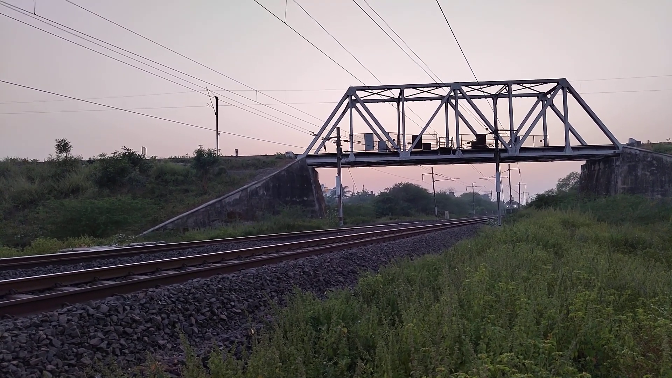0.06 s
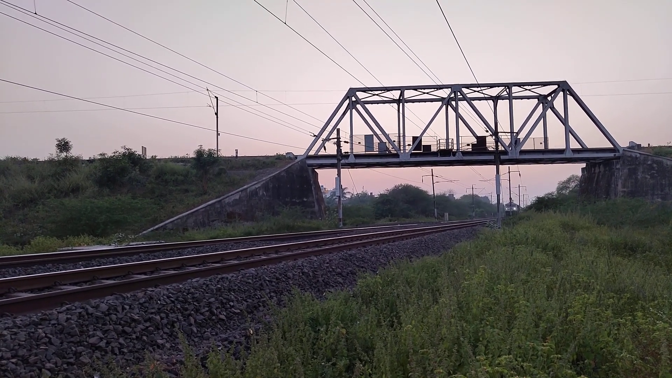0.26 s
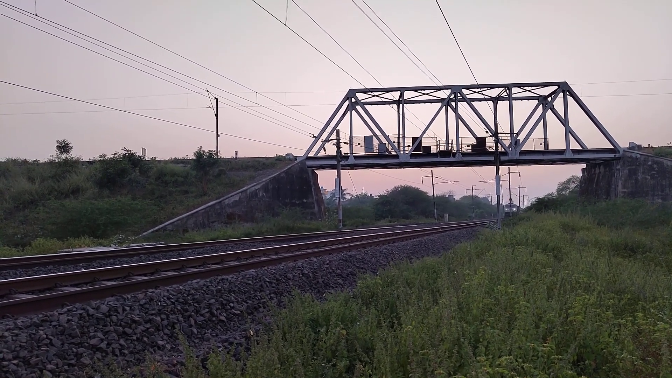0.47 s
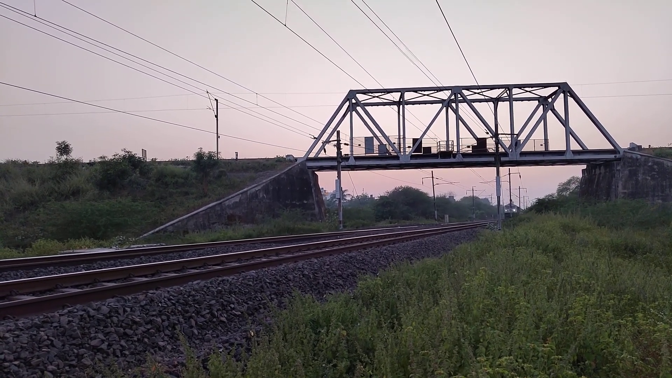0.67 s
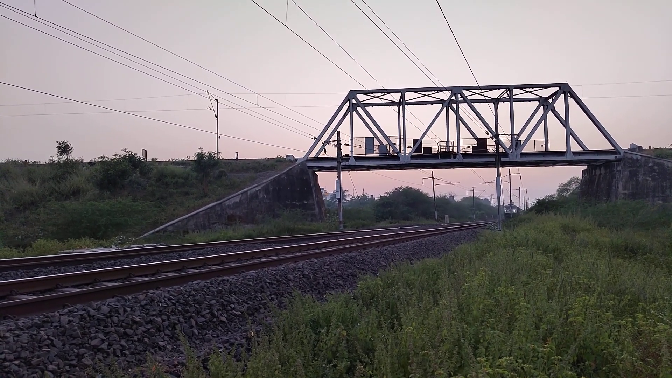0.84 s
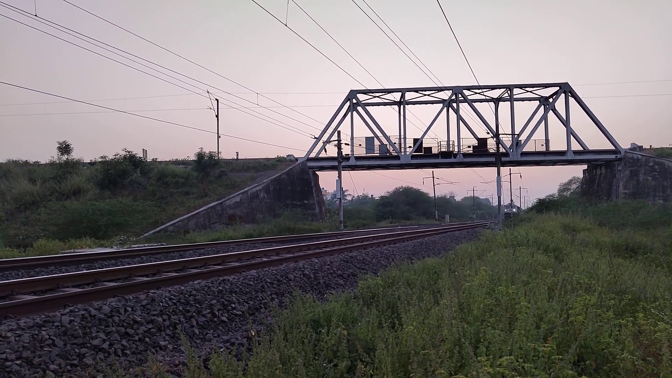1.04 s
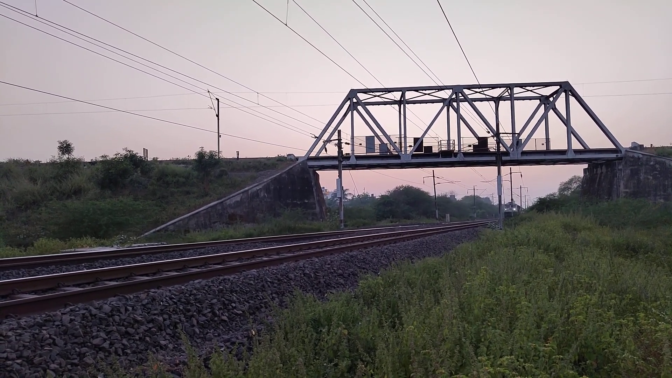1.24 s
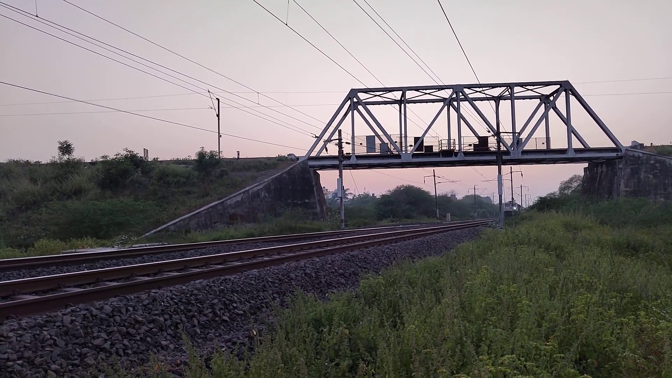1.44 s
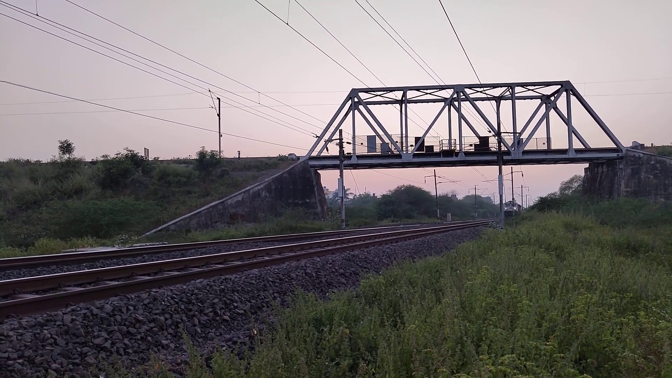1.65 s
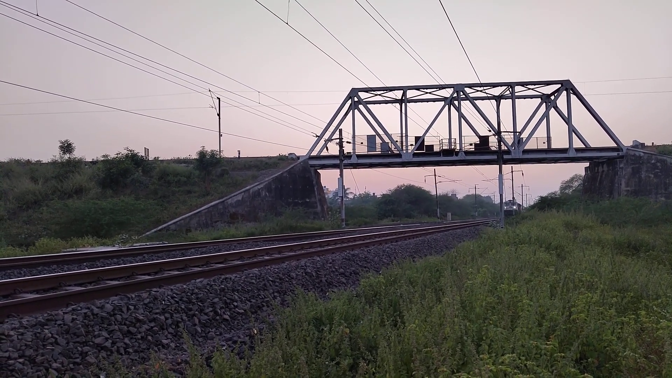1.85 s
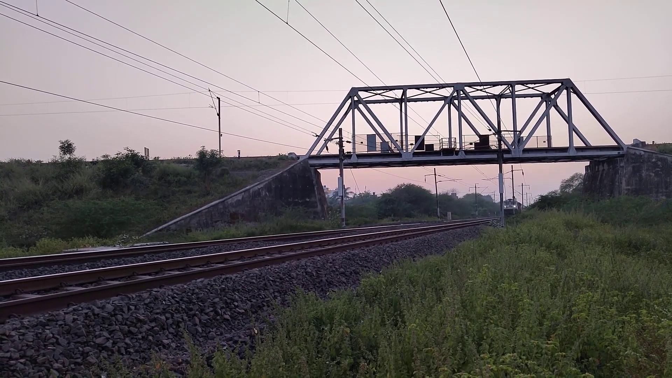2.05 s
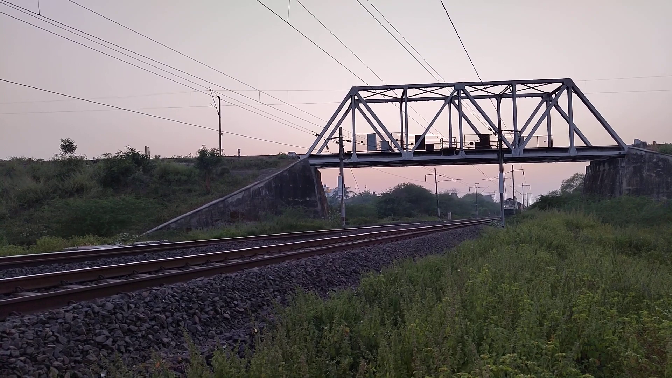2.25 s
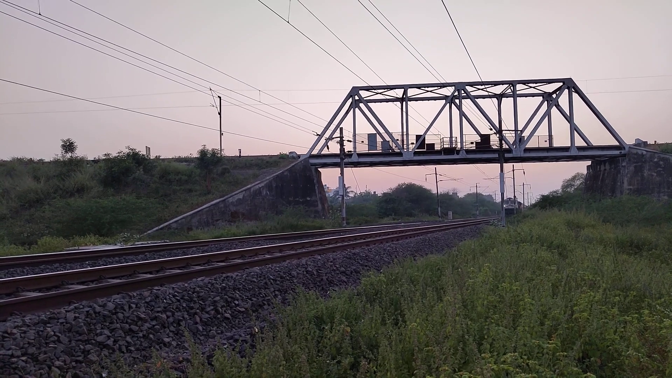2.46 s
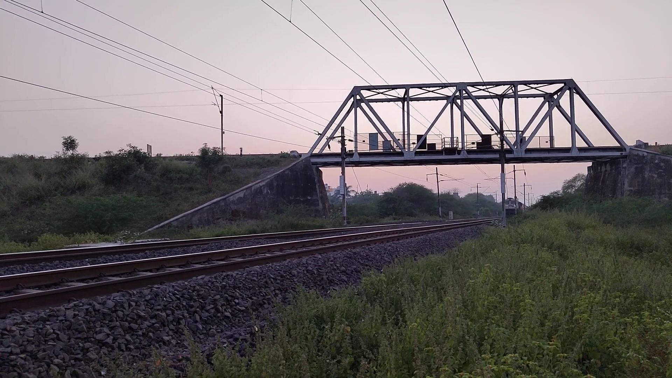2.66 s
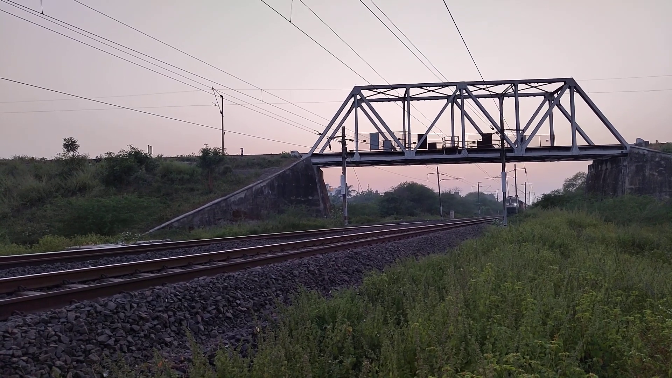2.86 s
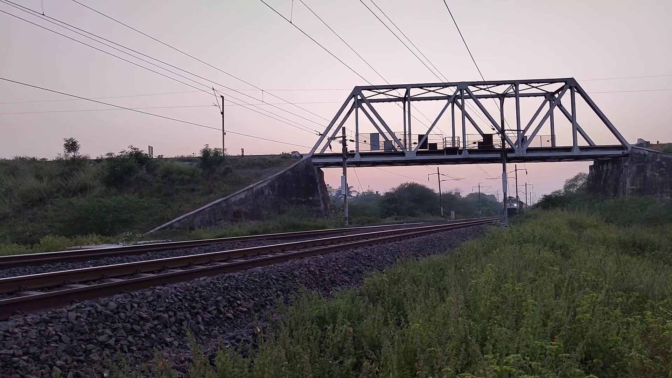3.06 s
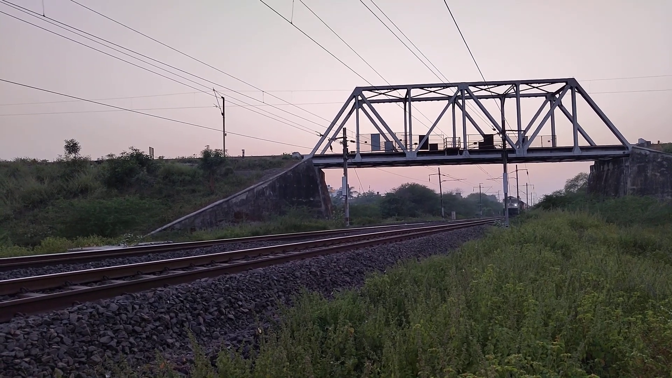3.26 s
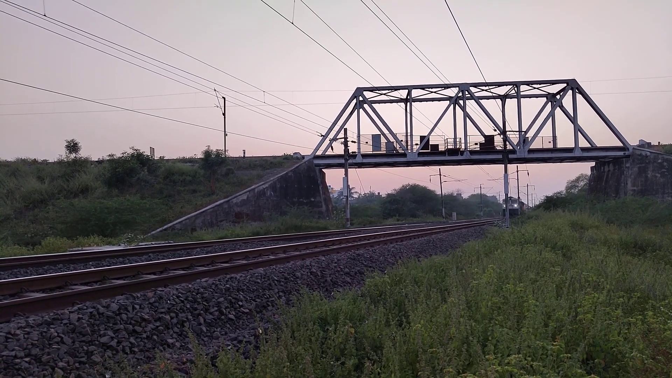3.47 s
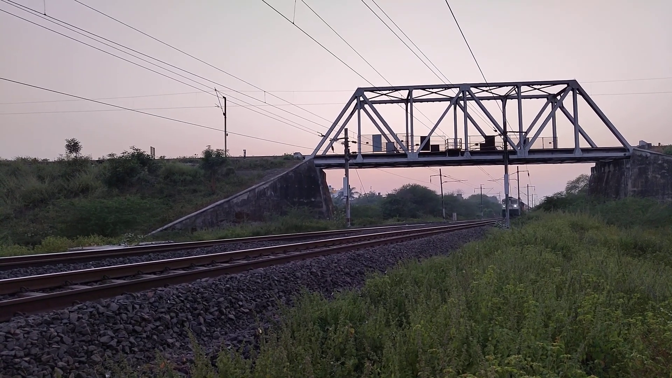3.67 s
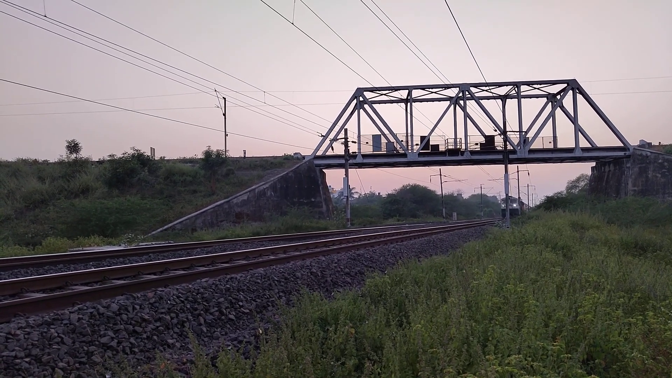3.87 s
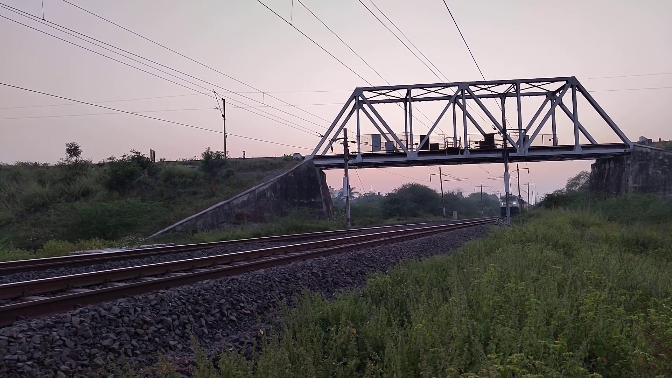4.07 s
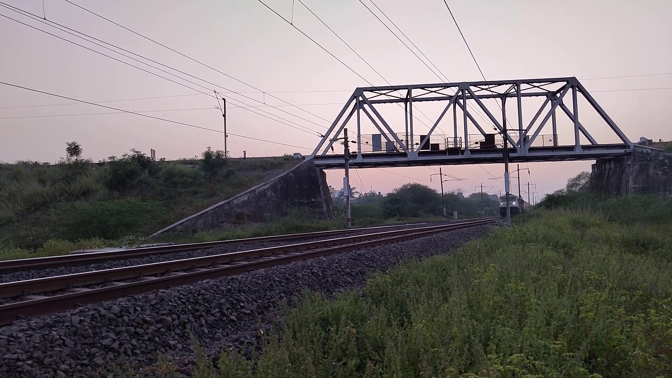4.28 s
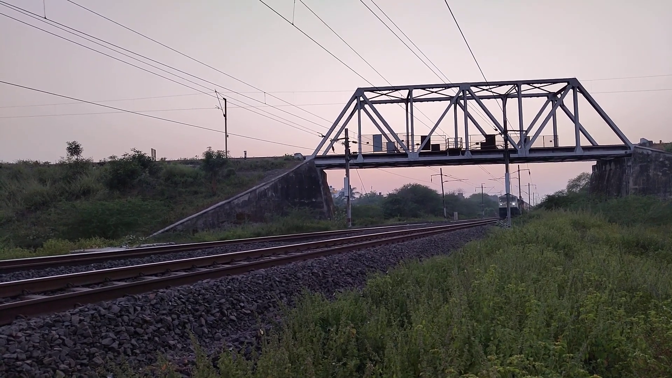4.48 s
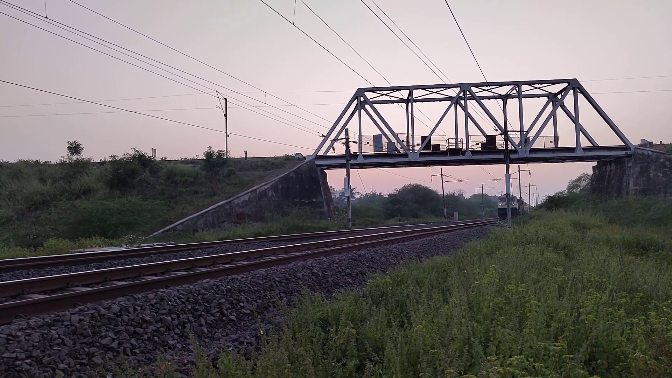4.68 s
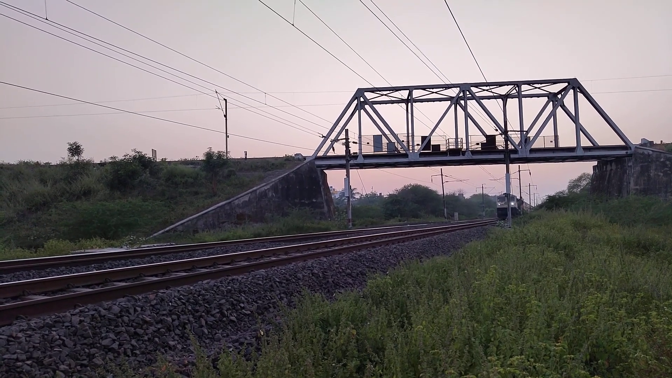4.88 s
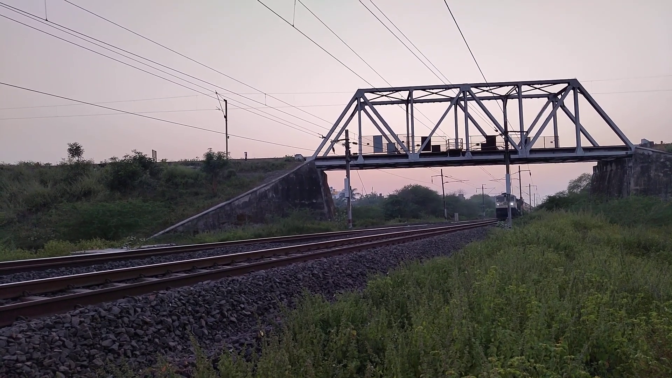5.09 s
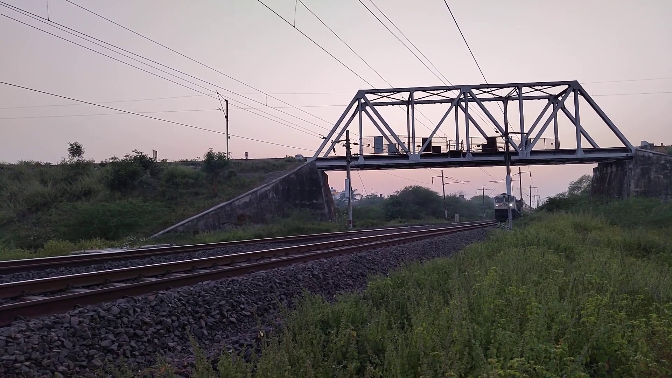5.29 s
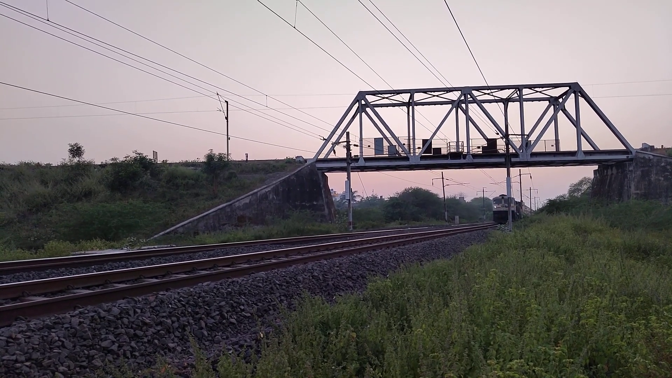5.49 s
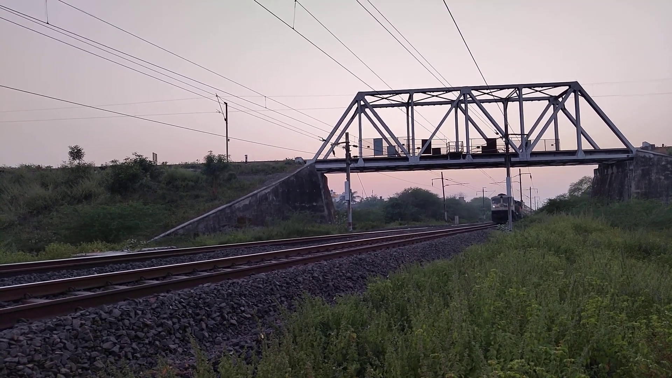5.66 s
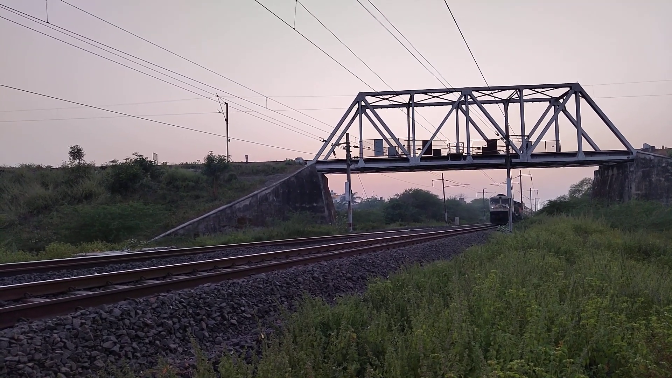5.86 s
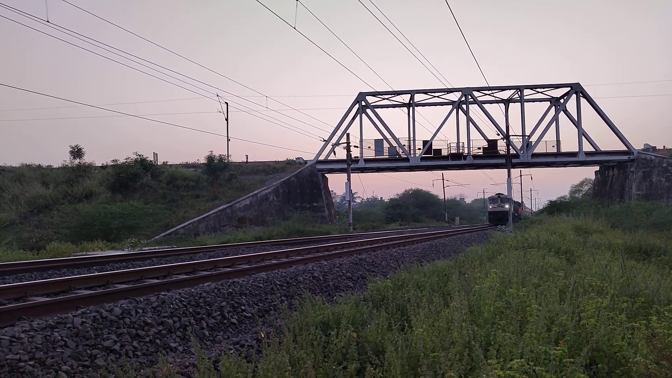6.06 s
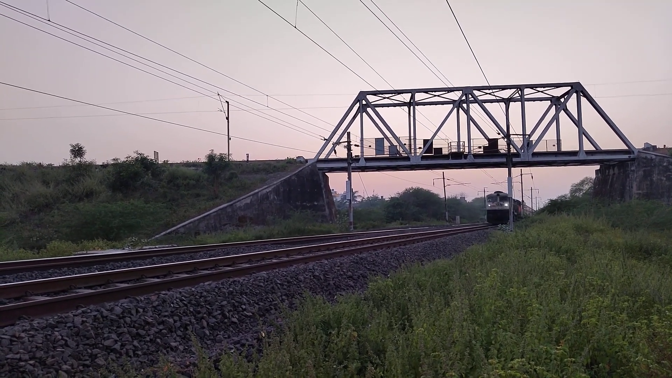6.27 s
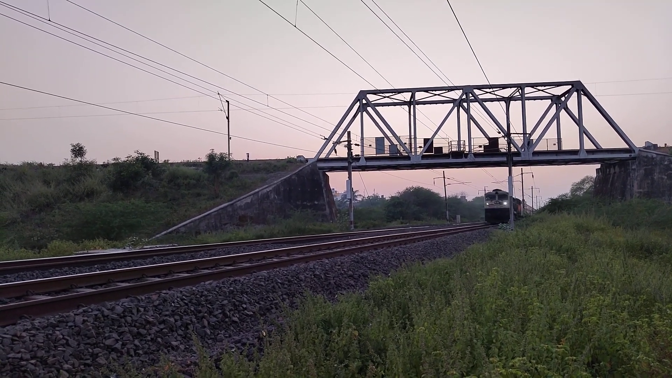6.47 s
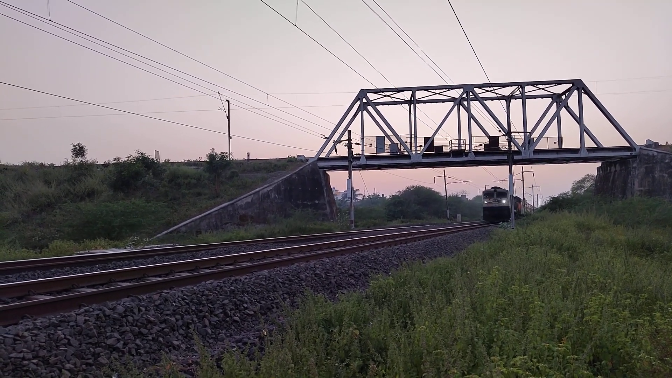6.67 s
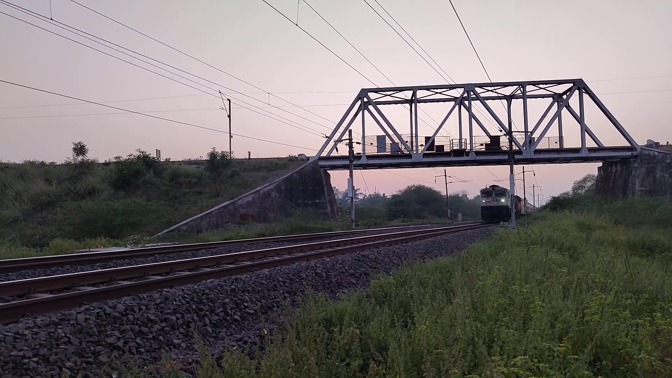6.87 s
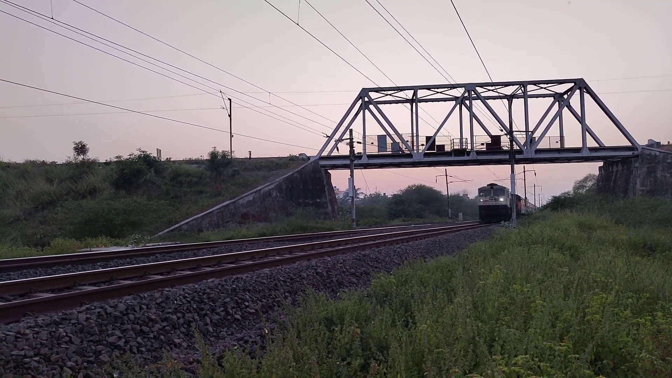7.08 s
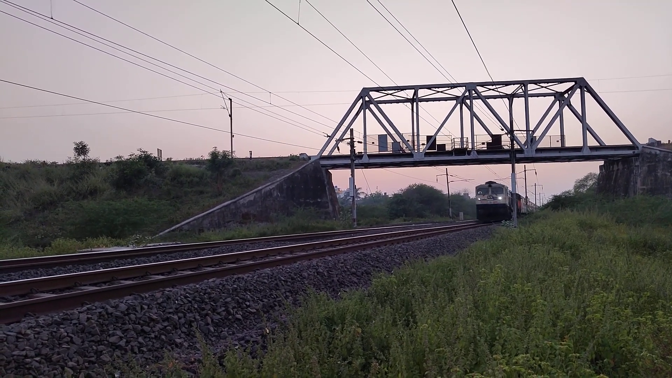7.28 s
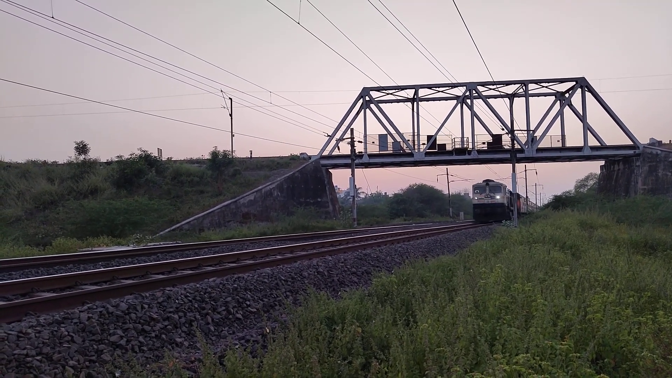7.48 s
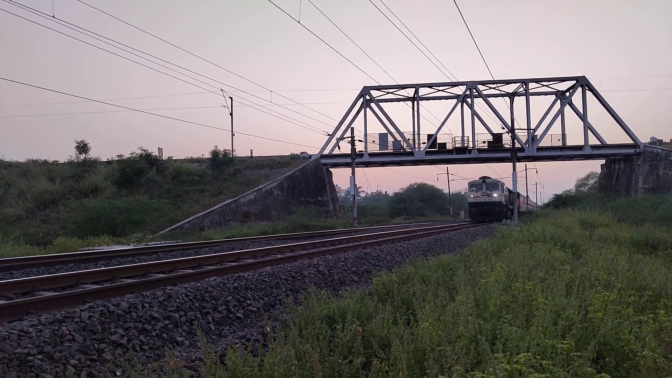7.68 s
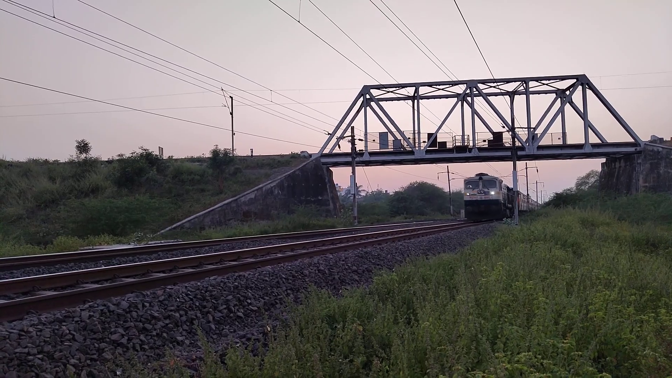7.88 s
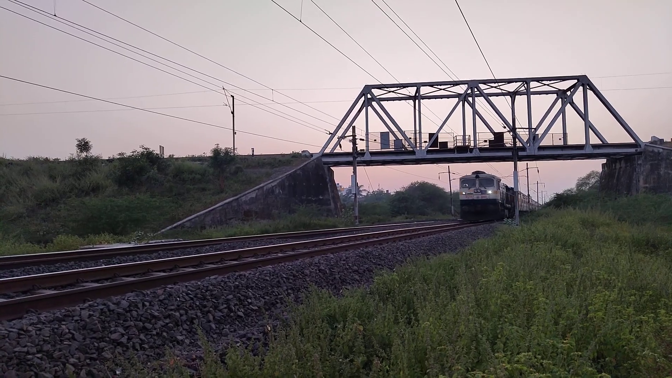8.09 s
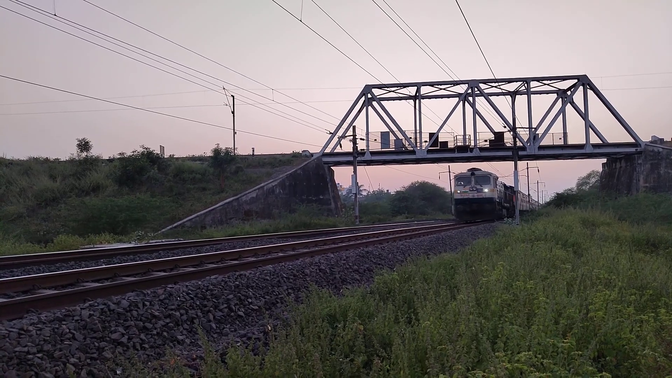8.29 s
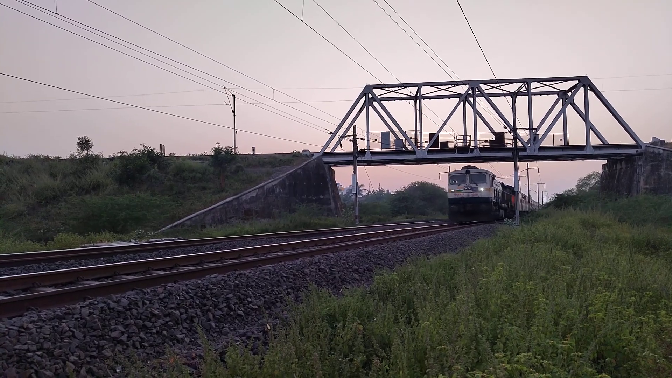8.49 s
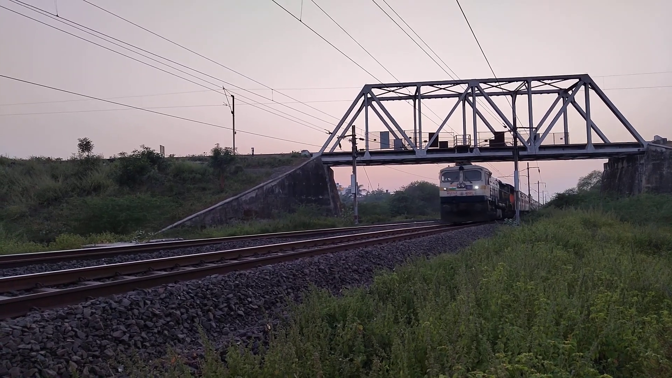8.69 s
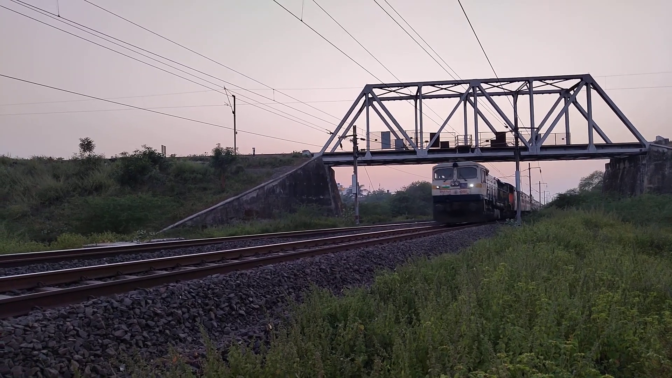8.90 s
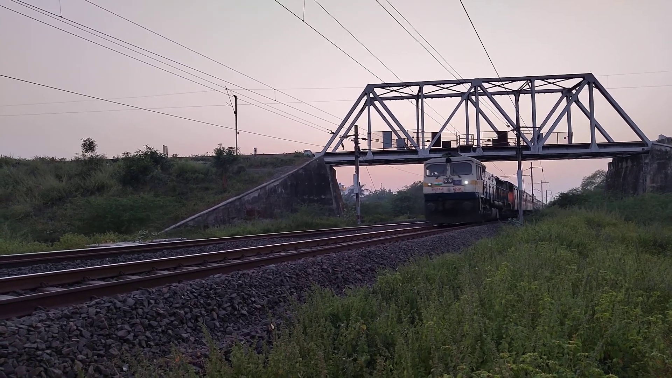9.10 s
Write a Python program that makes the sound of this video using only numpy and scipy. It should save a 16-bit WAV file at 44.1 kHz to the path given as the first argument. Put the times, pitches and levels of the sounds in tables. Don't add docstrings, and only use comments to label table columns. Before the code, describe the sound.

Distant chugging diesel engine grows steadily louder with rushing wheel noise, thin metallic rail ringing and rumble, surging loudly as the train arrives.

```python
import sys
import numpy as np
from scipy import signal
from scipy.fft import rfft, irfft
from scipy.io import wavfile
from scipy.ndimage import uniform_filter1d, minimum_filter1d

SR = 44100
rng = np.random.default_rng(int(sys.argv[2]) if len(sys.argv) > 2 else 0)


def nominal_scale(level):
    x = np.asarray(level, float) / 20
    return 10 ** x


def master(y):
    cut = np.clip(np.atleast_2d(y).T, -1, 1)
    pcm = np.round(cut * 32767)
    wavfile.write(sys.argv[1], SR, pcm.astype(np.int16))


N = 403074


def rms_one(x):
    return x / np.sqrt(np.mean(x ** 2) + 1e-20)


def in_time(rows):
    seconds, *columns = np.transpose(rows)
    return [np.interp(np.arange(N) / SR, seconds, column) for column in columns]


def at_hz(points, hz):
    table_hz, values = np.array(points)[:, 0], np.array(points)[:, 1]
    return np.interp(np.log(hz), np.log(table_hz), values)


def drift(rate_hz):
    r = np.exp(-80 * np.pi * rate_hz / SR)
    slow = signal.lfilter([1], [1, -2 * r, r * r], rng.standard_normal(N // 40 + 2002))[2000:]
    return np.interp(np.arange(N) / 40, np.arange(len(slow)), rms_one(slow - slow.mean()))


def resonance(x, hz, width_hz):
    r = np.exp(-np.pi * width_hz / SR)
    top = np.array([1, 0, -1]) * (1 - r * r) / 2
    return signal.lfilter(top, [1, -2 * r * np.cos(2 * np.pi * hz / SR), r * r], x)


def resonant_noise(noise, hz, width_hz):
    return rms_one(resonance(resonance(noise, hz, width_hz), hz, width_hz))


# f/Hz, likeness [0-1]
LIKENESS = [(60, 1), (450, .998), (700, .88), (1100, 0.61), (1500, 0.35), (2400, 0.49), (4000, 0.24),
            (9000, 0.37)]
# f/Hz, left minus right level/dB
LEAN = [(550, -0.1), (950, -1), (1650, -6.5), (2600, -2), (3500, 1.5), (4700, -5.5), (6500, 1.6),
        (9000, -5), (12500, -1.5)]


def spread(mid, side, hz):
    alike = np.clip(at_hz(LIKENESS, hz), 0, 1)
    lean = nominal_scale(at_hz(LEAN, hz) / 2 * np.array([[1], [-1]]))
    return lean * (mid + np.sqrt((1 - alike) / (1 + alike)) * side * [[1], [-1]])


# t/s, speed [turns per s]
CRANK = [(0.0, 16.431), (1.5, 16.449), (3.0, 16.462), (4.5, 16.465), (6.0, 16.468), (7.0, 16.463),
         (8.0, 16.428), (9.14, 16.512)]
# level/dB, lag down the exhaust [ms]
CYLINDERS = [(7.3, 59.21), (4.0, 54.9), (4.5, 56.86), (1.0, 53.0), (3.6, 58.8), (-0.8, 54.68),
             (-4.4, 55.05), (6.7, 63.16)]
# t/s, wavering share [0-1]
SCATTER = [
    (0, 0.2),
    (6.5, 0.1),
    (7.5, 0.31),
    (9.14, 0.48),
]
# order [per turn], far
# level/dB, swell [dB per s], change level/dB, change t/s
ORDERS_OF_CRANK = [(1, -57, -2, -2, 7.0), (2, -46, 1, 4, 7.5), (3, -38, 0.53, 1, 6.6),
                   (4, -46.5, 1.3, 4.5, 7.4), (5, -51.5, 1.75, 8, 7.8), (6, -40.5, 2.5, -8, 8.2),
                   (7, -40, 2.04, -11, 4.9), (8, -30, 1.0, 13.5, 7.35), (9, -40.5, 0.04, 13, 5.7),
                   (9, -61.5, 0.19, 43.5, 6.92), (4, -62.5, 0, 40, 8.17), (7, -62, 0.3, 43, 8.4),
                   (10, -45.5, 1.27, 12, 7.2), (11, -50.5, .5, 15.5, 7.2), (12, -51, 0.94, 0, 6.7),
                   (13, -55, 1.1, 7.5, 6.1), (15, -72, 4, -5, 7.9), (16, -74.5, 5, -14, 7.2)]
CLEARING_S = 0.33
BRIDGE_S, ECHO_SHARE, ECHO_RISE_S, ECHO_LOWERING = 6.74, .42, .8, .0236


def exhaust():
    t = np.arange(N) / SR
    turn = 2 * np.pi * np.cumsum(in_time(CRANK)[0]) / SR
    strength_db, lag_ms = np.transpose(CYLINDERS)
    firing = 2 * np.pi * (np.arange(8) / 8 + lag_ms * 16.46 / 1000)
    share = in_time(SCATTER)[0]
    echo = ECHO_SHARE * np.clip((t - BRIDGE_S) / ECHO_RISE_S, 0, 1)
    slip = ECHO_LOWERING * (turn - np.interp(BRIDGE_S, t, turn))
    out = 0
    for order, far_db, swell_db, change_db, change_s in ORDERS_OF_CRANK:
        k = round(order)
        cleared = .5 + .5 * np.tanh((t - change_s) / CLEARING_S)
        db = far_db + swell_db * t + change_db * cleared
        pattern = np.sum(nominal_scale(strength_db) * np.exp(-1j * k * firing))
        depth = share * (.5 if k == 8 else 1)
        waver = 1 + depth * (drift(2.0) + 1j * drift(4.6)) + echo * np.exp(-1j * k * slip)
        waver = waver / np.sqrt(.5 + depth ** 2)
        out = out + nominal_scale(db) * np.real(waver * np.exp(1j * (k * turn + np.angle(pattern))))
    return out


# t/s, level/dB
ROAR = [(0, -36.5), (.9, -34), (1.5, -34.5), (3.0, -33), (4.5, -30.5), (6.3, -28.5), (6.95, -23.5),
        (7.3, -20.5), (8.0, -19.5), (8.4, -21), (8.6, -20.5), (8.66, -15.5), (8.74, -18), (8.84, -15),
        (8.92, -8), (8.935, -18), (9.04, -13.5), (9.14, -22)]
ROAR_EDGES = [450, 1400, 3000]
# f/Hz, level/dB per Hz
ROAR_FAR = [(110, -33), (190, -7), (233, -28), (275, -22), (330, -20), (534, -4), (717, -3), (862, -10.5),
            (1250, -7), (1390, -16.5), (2420, -24), (3310, -29), (6560, -22.5), (14200, -50), (15600, -57)]
# f/Hz, level/dB per Hz
ROAR_NEAR = [(110, -32), (190, -6), (405, -7.5), (534, -4), (691, -3), (895, -12), (999, -5), (1450, -8.5),
             (2470, -14.5), (5770, -25), (7060, -14.5), (8180, -20.5), (9490, -29.5), (14000, -34.5),
             (15600, -38)]
# far level/dB, near level/dB
ROAR_PARTS = [
    (-15.5, -6),
    (-1.5, -1),
    (-5, -3),
    (-7, -2.5),
]


def roar(near):
    overall_db = in_time(ROAR)[0]
    levels = [overall_db + far_db + near * (near_db - far_db) for far_db, near_db in ROAR_PARTS]
    edges = np.geomspace(190, 15700, 23)
    centres = np.sqrt(edges[1:] * edges[:-1])
    group = np.searchsorted(ROAR_EDGES, centres)

    def band_shares(table):
        db = at_hz(table, centres) + 10 * np.log10(centres)
        return db - [10 * np.log10(np.sum(nominal_scale(2 * db[group == g]))) for g in group]

    far, close = band_shares(ROAR_FAR), band_shares(ROAR_NEAR)
    white, gust = rng.standard_normal((2, 2, N)), drift(4.8)
    pulse = np.cos(2 * np.pi * np.cumsum(in_time(CRANK)[0]) / SR - 1.2)
    out = 0
    for k, hz in enumerate(centres):
        sos = signal.butter(2, edges[k:k + 2], "band", fs=SR, output="sos")
        mid, side = rms_one(signal.sosfilt(sos, white[k % 2]))
        flutter_db = (0.22 + .5 * near) * gust + 1.33 * drift(13.4) + 0.085 * pulse
        band_db = levels[group[k]] + far[k] + near * (close[k] - far[k])
        out = out + nominal_scale(band_db + flutter_db) * spread(mid, side, hz)
    return out


BLOWER_HZ, BLOWER_FOLLOWS = 271.4, 1.17
BLOWER_DB = [
    -53,
    -38,
    -45.5,
]


def blower():
    roar_db = in_time(ROAR)[0]
    swing_db = BLOWER_FOLLOWS * (roar_db - roar_db.mean())
    phase = 2 * np.pi * np.cumsum(BLOWER_HZ * (1 + 0.0045 * drift(6.36))) / SR
    out = 0
    for k, db in enumerate(BLOWER_DB):
        waver_db = 2.9 * drift(16.0) + 1.2 * drift(1.3)
        out = out + nominal_scale(db + swing_db + waver_db) * np.sin((k + 1) * phase)
    return out


# t/s, length [s], f/Hz, width
# [Hz], level/dB
SWELLS = [(0.23, 0.23, 850, 340, -35.5), (3.302, 0.37, 1140, 400, -36.5), (6.7, 0.42, 770, 350, -22),
          (7.245, 0.39, 726, 210, -20), (7.62, 0.3, 980, 180, -24.5), (8.88, 0.14, 830, 1500, -12.5),
          (6.1, 3.3, 286, 230, -38), (6.2, 6.4, 273, 32, -39.5), (6.95, 0.19, 547, 12, -23),
          (6.11, 0.6, 547, 13, -31), (7.2, 0.42, 820, 7.3, -23), (7.3, 0.36, 820, 18, -22)]


def swells():
    t, out = np.arange(N) / SR, 0
    noise = rng.standard_normal((2, N))
    for s, length, hz, width_hz, db in SWELLS:
        puff = resonant_noise(noise, hz, width_hz)
        out = out + nominal_scale(db) * np.exp(-8 * ((t - s) / length) ** 2) * spread(*puff, hz)
    return out


def modes(noise, table, widen):
    out = 0
    for hz, width_hz, db in table:
        ring = resonant_noise(noise, hz, widen * width_hz)
        out = out + nominal_scale(db + 2.3 * drift(4.4)) * spread(*ring, hz)
    return rms_one(out)


RAIL_ATTACK_S, RAIL_JOLT_DB, RAIL_JOLT_S = .006, 1, 0.0092
RAIL_T60_S, RAIL_TAIL_DB, RAIL_TAIL_T60_S = 0.39, -20, 0.67


def burst(t, hold):
    rise = np.clip(t / RAIL_ATTACK_S, 0, 1) * nominal_scale(RAIL_JOLT_DB * np.exp(-np.abs(t) / RAIL_JOLT_S))
    after = np.maximum(t - hold, 0)
    return rise * (nominal_scale(-60 * after / RAIL_T60_S) + nominal_scale(RAIL_TAIL_DB - 60 * after / RAIL_TAIL_T60_S))


# f/Hz, width [Hz], level/dB
RAIL_MODES = [(11600, 21, 5), (12200, 27, 6), (12500, 50, 7), (12200, 34, -1), (13000, 14, 13),
              (12500, 58, 10), (13400, 35, 2), (13400, 19, -7), (14000, 34, -6), (15000, 26, 1),
              (14300, 87, -2), (15400, 52, -6)]
# f/Hz, width [Hz], level/dB
RAIL_UPPER = [(9760, 480, -4.5), (9850, 86, -14), (10900, 510, -5.5)]
# f/Hz, width [Hz], level/dB
RAIL_LOW = [(1710, 190, -3), (2150, 120, -5.5), (2237, 280, -1.5)]
# t/s, hold [s], level/dB, lower high modes level/dB, low ring level/dB
RAIL_BURSTS = [(0.0, 0.029, -64, 13, -11), (0.25, 0.11, -70.5, 14, -5), (0.595, 0.62, -36, -12, -3),
               (2.19, 0.026, -52, -14, -11), (2.38, 0.21, -40.5, -13, -16.5), (4.24, .03, -44.5, -14, 4),
               (4.321, 0.28, -28.5, -11.5, -6.5), (5.52, 0.065, -44, -5.5, -2), (6.25, .03, -45, -7, -6),
               (7.764, .06, -37, -5, 1), (7.843, 0.56, -43.5, 6, 0), (8.467, .04, -39, 5, -6),
               (8.62, 0.089, -25, 0, -4), (8.772, 0.12, -26.5, 4, -6), (8.945, 0.15, -37.5, 5, -11)]


def rails():
    noise = rng.standard_normal((2, N))
    wash = signal.sosfilt(signal.butter(4, [11100, 15500], "band", fs=SR, output="sos"), noise[::-1])
    high = nominal_scale(-5) * modes(noise, RAIL_MODES, 1.2) + rms_one(spread(*wash, 13000))
    upper = modes(noise, RAIL_UPPER, 1.4)
    low = modes(noise, RAIL_LOW, 0.77) * nominal_scale([[2], [-2]])
    coarse = np.arange(0, N, 40) / SR
    gains = 0
    for s, hold, db, upper_db, low_db in RAIL_BURSTS:
        gains = gains + np.outer(nominal_scale([db, db + upper_db, db + low_db]), burst(coarse - s, hold))
    high_gain, upper_gain, low_gain = [np.interp(np.arange(N) / SR, coarse, g) for g in gains]
    return high_gain * high + upper_gain * upper + low_gain * low


# t/s, level/dB
RUMBLE = [
    (0, -49.5),
    (2, -35),
    (4, -30.5),
    (6, -27.5),
    (7, -23),
    (8, -24),
    (9.14, -20.5),
]


def rumble():
    sos = signal.butter(4, [24, 140], "band", fs=SR, output="sos")
    return nominal_scale(in_time(RUMBLE)[0]) * rms_one(signal.sosfilt(sos, rng.standard_normal(N)))


def scene():
    near = np.clip((np.arange(N) / SR - 3.5) / 6.14, 0, 1)
    return exhaust() + roar(near) + blower() + swells() + rails() + rumble()


# f/Hz, turn [radians]
PORT_TURN = [(500, -.03), (1150, -.35), (1500, -1.9), (2050, -2.6), (2450, -.4), (4400, .6), (7800, -3.1),
             (10500, 1.4)]
# f/Hz, width [Hz], level/dB
PORTS = [(846, 68, -7.5), (1406, 77, -31), (2363, 187, 4.5), (2650, 260, -0.5), (3450, 180, 0),
         (5710, 1700, -4), (8150, 230, -20), (8550, 330, -27), (10450, 260, -2), (12800, 1070, -5)]


def microphone(x):
    hz = np.fft.rfftfreq(N, 1 / SR) + 1
    right = irfft(rfft(x[1]) * np.exp(1j * at_hz(PORT_TURN, hz)), N)
    x = np.array([x[0], right])
    for hz, width_hz, db in PORTS:
        x = x + (nominal_scale(db) - 1) * resonance(x, hz, width_hz)
    return signal.sosfilt(signal.butter(2, 25, "high", fs=SR, output="sos"), x)


def limiter(x):
    room = np.minimum(1, .92 / (np.abs(x).max(axis=0) + 1e-9))
    return x * uniform_filter1d(minimum_filter1d(room, size=400), size=400)


# f/Hz, level/dB against neighbours, level/dB against the 3-8 kHz hiss
MASKING = [(1200, -30, -60), (1700, -9, -60), (3200, -8, -50), (4300, -2.5, -40), (7600, -3, -40),
           (8600, -2, -34), (11500, -1, -30), (14500, -.5, -26), (14800, -2, -8)]


def starve(x, jitter_db, dead_db):
    window = np.sqrt(signal.get_window("hann", 2048))
    lead = 719
    hz, _, cells = signal.stft(np.pad(x, [(0, 0), (lead, 0)]), SR, window, 2048, 1024)
    lines = np.abs(cells[:, :1024]) ** 2
    power = lines.sum(axis=0).reshape(128, 8, -1).mean(axis=1)
    power = uniform_filter1d(power, size=2, axis=1)
    at, local_db, hiss_db = np.transpose(MASKING)
    band_hz = hz[4:1024:8]
    local = uniform_filter1d(power, size=13, axis=0) * nominal_scale(2 * np.interp(band_hz, at, local_db))[:, None]
    hiss = power[18:46].mean(axis=0) * nominal_scale(2 * np.interp(band_hz, at, hiss_db))[:, None]
    limit = np.maximum(local, hiss)
    whim = np.sqrt(3) * uniform_filter1d(rng.standard_normal(power.shape), size=3, axis=1)
    kept = np.repeat(power > limit * nominal_scale(2 * jitter_db * whim), 8, axis=0)
    alive = lines > np.repeat(limit, 8, axis=0) * nominal_scale(2 * dead_db)
    cells[:, :1024] *= kept * alive
    return signal.istft(cells, SR, window, 2048, 1024)[1][:, lead:lead + N]


def roll_off(x):
    return signal.sosfilt(signal.butter(12, 15760, fs=SR, output="sos"), x)


def record(dry):
    held = limiter(microphone(dry))
    mix = starve(held, jitter_db=2.5, dead_db=-3.5)
    return roll_off(mix)


dry = scene()
out = record(dry)
master(out)
```